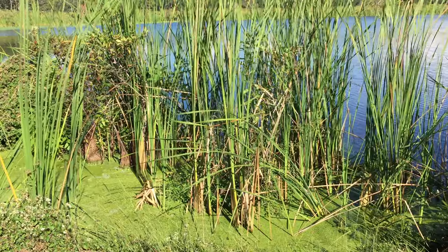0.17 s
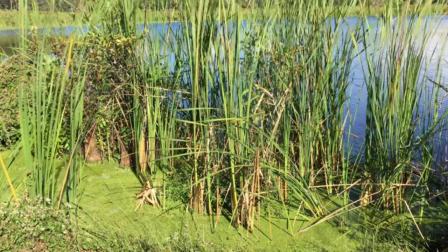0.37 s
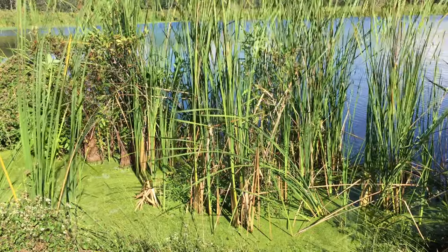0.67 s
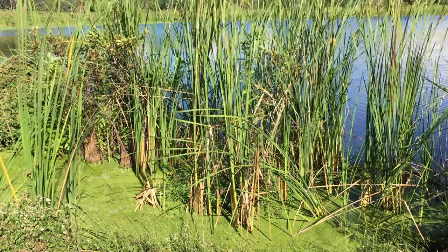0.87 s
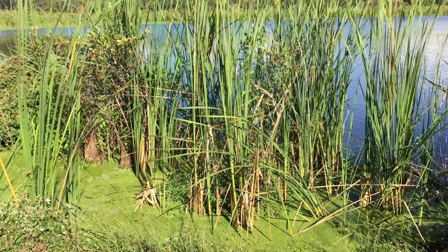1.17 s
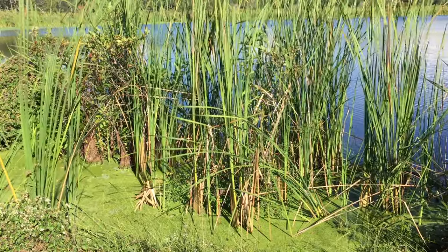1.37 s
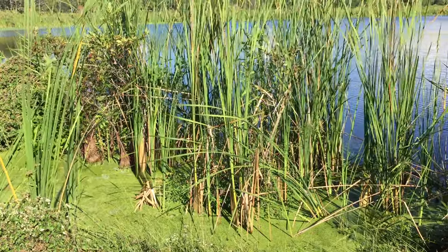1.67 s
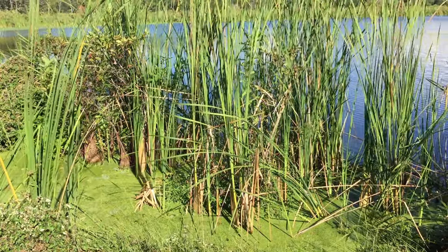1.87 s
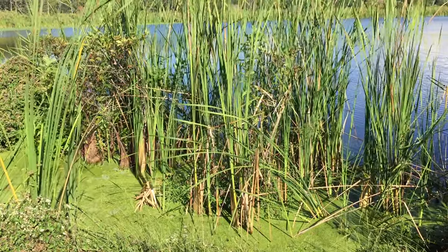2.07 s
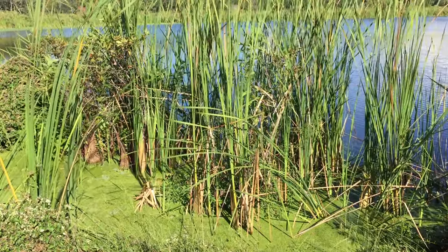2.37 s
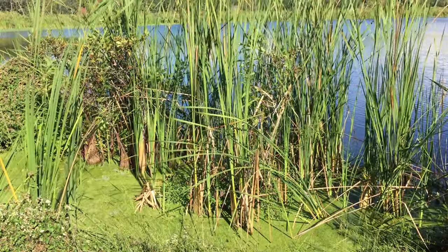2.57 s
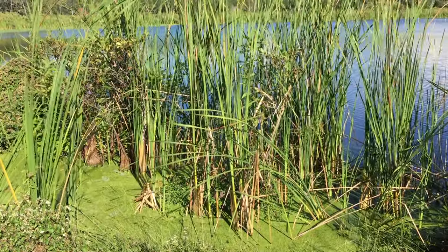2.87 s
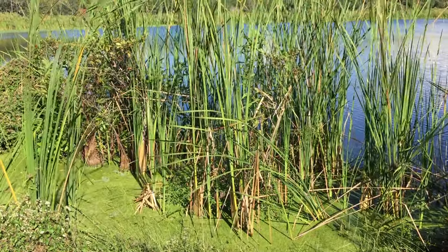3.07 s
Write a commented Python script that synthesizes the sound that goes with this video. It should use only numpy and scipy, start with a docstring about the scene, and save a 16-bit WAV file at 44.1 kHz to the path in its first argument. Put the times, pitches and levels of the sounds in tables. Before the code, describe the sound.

Katydids call from reeds at a pond's edge, starting with quick, dry wing ticks for the first 0.7 seconds. A distant one starts buzzing at about 0.6 seconds, and a closer one swells in by 1 second. Their very high, steady buzz lasts until the end, just past 3 seconds. Light wind rumbles and bumps on the microphone throughout, easing around 2.5 seconds, over faint leaf rustle and open-air hiss.

```python
"""Two katydids, one near and one far, in the reeds at the edge of a pond: a few dry wing ticks,
then both swell into a steady, very high buzz. Every wing stroke drags a scraper over a file of
tiny teeth, and the reeds scatter the sound a little. Another insect gives one faint, thin whistle.
A light wind rumbles and bumps on the microphone over a soft rustle of leaves and open-air hiss."""
import sys
import numpy as np
from scipy import signal
from scipy.fft import rfft, irfft
from scipy.io import wavfile
from scipy.ndimage import uniform_filter1d

SR = 44100
rng = np.random.default_rng(int(sys.argv[2]) if len(sys.argv) > 2 else 0)


def digitize_waveform(pressure):
    """Quantize a signal to 16-bit integers and store it at the path in sys.argv[1].

    Rows of a 2-D input are taken as channels; values are limited to [-1, 1].
    """
    field = np.atleast_2d(pressure).T
    bounded = np.clip(field, -1, 1)
    quanta = np.round(bounded * 32767).astype(np.int16)
    wavfile.write(sys.argv[1], SR, quanta)


N = 142002

# swell of the near and of the far katydid: t/s, level/dB
NEAR_SWELL = [(.5, -80), (.6, -64), (.8, -43), (1.0, -37.5), (1.3, -36), (1.9, -34.5), (2.6, -34.5),
              (3.22, -35)]
FAR_SWELL = [(.5, -68), (.58, -47.5), (.72, -42), (1.2, -42), (3.22, -46)]
# single closing strokes of the wings: t/s, level/dB
CLOSING_TICKS = [(.018, -38), (.062, -37), (.084, -31), (.108, -37), (0.147, -31.5), (0.204, -39),
                 (0.2102, -30.5), (.253, -37.5), (0.273, -31), (.307, -37), (0.342, -31.5), (0.361, -37.5),
                 (.411, -32), (.529, -32.5), (0.587, -31.5), (.650, -30.5), (.738, -31)]
# duller, softer scuffs of the wings opening: t/s, level/dB
OPENING_SCUFFS = [(0.034, -53), (0.05, -50.5), (0.114, -50.5), (0.176, -49), (0.224, -53.5), (0.239, -48.5),
                  (0.279, -50), (0.307, -49.5), (0.333, -53), (.374, -51), (.386, -54), (.494, -52),
                  (0.508, -67), (0.552, -50)]
# colour of the closing and of the opening wing: f/Hz, level/dB
CLOSING_SPECTRUM = [(3000, -48), (5000, -43), (6000, -30), (6600, -26.5), (8000, -19), (9400, -10),
                    (10400, -11), (11700, -8), (13000, -5.5), (14700, -1.5), (15400, 0.5)]
OPENING_SPECTRUM = [(3000, -43), (5500, -24.5), (6600, -12.5), (8000, -4), (9400, 1.5), (10500, -3),
                    (12500, -4.5), (15400, -5.5)]
# gusts on the microphone: t/s, deep rumble level/dB, upper rumble level/dB
GUSTS = [(0, -34.5, -44.5), (.2, -66, -42.5), (.36, -52, -37), (.47, -37, -32.5), (.6, -44, -40),
         (.88, -41.5, -40.5), (1.07, -37.5, -38.5), (1.22, -48.5, -37.5), (1.37, -38, -37),
         (1.6, -43.5, -39.5), (1.85, -40.5, -39), (2.03, -51, -37.5), (2.27, -36, -41.5), (2.38, -48, -51),
         (2.73, -55, -55), (2.9, -47, -49.5), (3.06, -41, -46), (3.22, -59, -39.5)]
# deep and upper rumble of the gusts, and the steady rumble under them: f/Hz, level/dB
DEEP_SPECTRUM = [(8, -51), (25, -16), (38, -8), (50, -2), (90, 2), (115, -4.5), (160, -34.5), (400, -61.5)]
UPPER_SPECTRUM = [(60, -29), (100, -6.5), (130, 0), (200, -3.5), (250, -9.5), (310, -19), (370, -34),
                  (440, -54), (800, -76), (2000, -85)]
LULL_SPECTRUM = [(8, -45), (25, -19), (60, 4), (200, -4.5), (310, -9.5), (370, -18), (440, -33),
                 (1000, -71)]
# eddies that bump the microphone: t/s, length/s, level/dB, pitch/Hz
EDDIES = [(.100, 0.034, -33.5, 70), (.235, 0.052, -40.5, 60), (.428, 0.029, -35.5, 202),
          (0.614, .04, -40.5, 170), (.750, 0.039, -38, 60.3), (.935, 0.036, -35, 71),
          (1.088, 0.036, -26, 101), (1.117, 0.016, -39.5, 239), (1.315, 0.04, -35.5, 118),
          (1.920, 0.038, -36, 67), (2.776, 0.056, -42.5, 66), (3.02, 0.051, -46, 60.4)]
# colour of one eddy: f/pitch, level/dB
EDDY_SPECTRUM = [(.15, -20), (.6, -9.5), (1, -4), (1.5, -8.5), (2.1, -24.5), (3, -35.5), (5, -52),
                 (20, -96)]
# leaves in the breeze: t/s, level/dB
LEAF_SWELL = [(0, -69.5), (.3, -70), (.5, -67.5), (.7, -71), (1.1, -85), (3.22, -77)]
# colour of the leaves and of the open air: f/Hz, level/dB
LEAF_SPECTRUM = [(200, -6.5), (600, 3), (900, -5), (1700, -8.5), (3000, -21), (8000, -15)]
AIR_SPECTRUM = [(100, 7.5), (430, 2.5), (600, 5), (800, 3), (1300, -0.5), (2000, -0.5), (3200, -3),
                (5000, -6.5), (15000, -6.5)]

CLOSE_PEAK, CLOSE_END, OPEN_AT, OPEN_WIDTH = 0.42, 0.75, 0.94, 0.099  # shares of one wing cycle
TEETH_PER_S, TOOTH_JITTER, TOOTH_SPREAD_DB = 2600, .3, 2.5
RING_START_HZ, RING_END_HZ, RING_WIDTH_HZ = 15310, 10500, 2600
TICK_S, TICK_ATTACK_S, TICK_RELEASE_S, SCUFF_S = 0.0083, .001, 0.0015, 0.011
REEDS_T60_S, REEDS_DELAY_S = 0.076, 0.0022
LULL_DB, AIR_DB = -53.5, -68


def katydid_buzz(swell, strokes_per_s, wander_cycles, uneven_db, open_db, stroke_at_s=.55, floor=.3):
    """Wings close with growing force, let go, and scuff open again, many times a second."""
    t = np.arange(N) / SR
    drift = unit(sum(np.sin(2 * np.pi * (hz * t + rng.random())) / hz for hz in np.geomspace(.2, 6, 12)))
    cycles = (t - stroke_at_s) * strokes_per_s + wander_cycles * drift
    phase = cycles % 1
    stroke = np.floor(cycles - np.floor(cycles.min())).astype(int)
    strength = amp(uneven_db * rng.standard_normal(N)[stroke])  # one value per stroke
    force = np.interp(phase, [0, CLOSE_PEAK * 2 / 3, CLOSE_PEAK, CLOSE_END], [floor, 1, 1, floor])
    closing = closing_wing(force * strength, travel=phase / CLOSE_END * (phase < CLOSE_END))
    opening = opening_wing(np.exp(-.5 * ((phase - OPEN_AT) / OPEN_WIDTH) ** 2))
    return level(swell) * (closing + amp(open_db) * opening)


def katydid_ticks():
    """Separate wing strokes, closing and opening, before the buzz gets going."""
    out = np.zeros(N)
    t = np.arange(0, TICK_S, 1 / SR)
    force = np.minimum(t / TICK_ATTACK_S, 1) * np.minimum((TICK_S - t) / TICK_RELEASE_S, 1)
    for start, db in CLOSING_TICKS:
        add(out, start, amp(db) * closing_wing(force, travel=t / TICK_S))
    for start, db in OPENING_SCUFFS:
        add(out, start, amp(db) * opening_wing(arch(SCUFF_S)))
    return out


def closing_wing(force, travel):
    """Tooth clicks ring the wing, whose resonance sinks as it closes (travel 0-1)."""
    hz = RING_START_HZ + (RING_END_HZ - RING_START_HZ) * np.clip(travel, 0, 1) ** 2
    carrier = np.exp(2j * np.pi * np.cumsum(hz) / SR)
    pole = np.exp(-np.pi * RING_WIDTH_HZ / SR)
    clicks = force * tooth_clicks(len(force))
    # gliding resonance: shift down by the carrier, low-pass, shift back up
    ring = carrier * signal.lfilter([1 - pole], [1, -pole], clicks / carrier)
    return unit(colour(ring.real, CLOSING_SPECTRUM))


def opening_wing(force):
    """The scraper slides back over the file with a duller scuff."""
    return unit(colour(force * tooth_clicks(len(force)), OPENING_SPECTRUM))


def tooth_clicks(size):
    """Slightly uneven clicks of the scraper crossing the file."""
    gaps, force, side = rng.standard_normal((size // 4, 3)).T
    at = (np.cumsum(np.exp(TOOTH_JITTER * gaps)) * SR / TEETH_PER_S).astype(int)
    heights = np.sign(side) * amp(TOOTH_SPREAD_DB * force)
    clicks = np.zeros(size)
    clicks[at[at < size]] = heights[at < size]
    return clicks


def reed_scatter(sound, echo_db, count=6):
    """Direct sound plus a short diffuse echo from the stems, changing slowly as they sway."""
    t = np.arange(SR // 2) / SR
    decay = np.exp(-np.log(1000) * t / REEDS_T60_S) * (t > REEDS_DELAY_S)
    sway = np.linspace(0, count - 1, N)
    echo = np.zeros(N)
    for k in range(count):
        tail = rng.standard_normal(len(t)) * decay
        crossfade = np.sqrt(np.maximum(1 - abs(sway - k), 0))
        echo += signal.fftconvolve(sound * crossfade, tail / np.linalg.norm(tail))[:N]
    return sound + amp(echo_db) * echo


def microphone_wind():
    """Turbulence at the microphone: two gusty bands, a steady rumble and a few short eddies."""
    out = level(GUSTS, column=1) * noise(DEEP_SPECTRUM)
    out += level(GUSTS, column=2) * noise(UPPER_SPECTRUM)
    out += amp(LULL_DB) * noise(LULL_SPECTRUM)
    for start, length, db, hz in EDDIES:
        envelope = arch(length)
        eddy = noise(np.array(EDDY_SPECTRUM) * [hz, 1], size=8192)[:len(envelope)]
        add(out, start, amp(db) * unit(envelope * eddy))
    return out


def insect_whistle(start_s=0.446, length_s=0.098, pitch_hz=9060, waver_hz=170, db=-69):
    """Another insect sounds one faint, nearly pure note in a pause between the ticks."""
    envelope = arch(length_s)
    waver = unit(uniform_filter1d(rng.standard_normal(N), size=100))[:len(envelope)]
    tone = np.sin(2 * np.pi * np.cumsum(pitch_hz + waver_hz * waver) / SR)
    out = np.zeros(N)
    add(out, start_s, amp(db) * unit(envelope * tone))
    return out


def air_and_leaves():
    """Faint open-air hiss, and leaves rustling softly in the first breeze."""
    return amp(AIR_DB) * noise(AIR_SPECTRUM) + level(LEAF_SWELL) * noise(LEAF_SPECTRUM)


def amp(db):
    """Decibels to gain."""
    return 10 ** (np.asarray(db) / 20)


def unit(x):
    """Scales to rms 1."""
    return x / np.sqrt(np.mean(x ** 2) + 1e-20)


def arch(length_s):
    """A smooth rise and fall."""
    return np.hanning(round(length_s * SR))


def level(curve, column=1):
    """Gain over the whole scene from one dB column of a curve."""
    rows = np.array(curve)
    return amp(np.interp(np.arange(N) / SR, rows[:, 0], rows[:, column]))


def colour(x, spectrum):
    """Filters by points of f/Hz, level/dB joined on a log-frequency axis."""
    hz, db = np.transpose(spectrum)
    f = np.fft.rfftfreq(len(x), 1 / SR)
    gain = amp(np.interp(np.log(f + 1), np.log(hz), db))
    return irfft(rfft(x) * gain, len(x))


def noise(spectrum, size=N):
    """Coloured noise of rms 1."""
    return unit(colour(rng.standard_normal(size), spectrum))


def add(mix, start_s, sound):
    """Mixes a sound in at a time."""
    part = mix[max(round(start_s * SR), 0):][:len(sound)]
    part += sound[:len(part)]


def scene():
    """One microphone at the pond's edge; the far katydid reaches it with a larger share of echo."""
    near = katydid_buzz(NEAR_SWELL, strokes_per_s=59.5, wander_cycles=0.048, uneven_db=.9, open_db=-19.5)
    far = katydid_buzz(FAR_SWELL, strokes_per_s=74.2, wander_cycles=.3, uneven_db=3, open_db=-10.5)
    insects = reed_scatter(katydid_ticks() + near + insect_whistle(), echo_db=-7)
    insects += reed_scatter(far, echo_db=-1)
    background = air_and_leaves()
    return (insects + microphone_wind() + background)[None]


def record(dry):
    """The recorder's steep band limit."""
    lowpass = signal.firwin(601, cutoff=15400, window=("kaiser", 8), fs=SR)
    return signal.oaconvolve(dry, lowpass[None], "same")


dry = scene()
out = record(dry)
digitize_waveform(out)
```